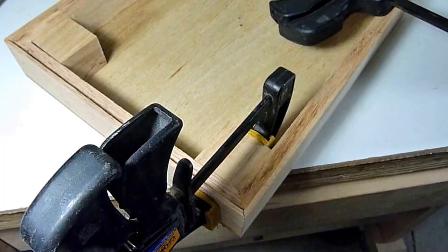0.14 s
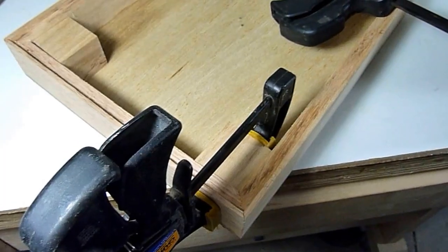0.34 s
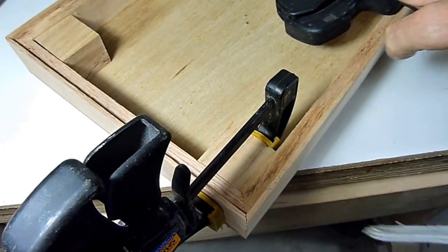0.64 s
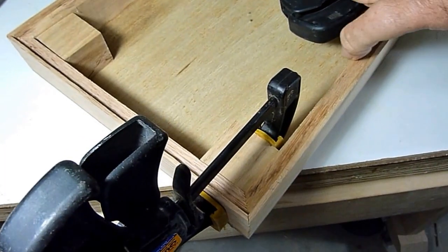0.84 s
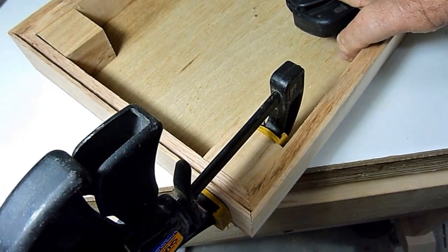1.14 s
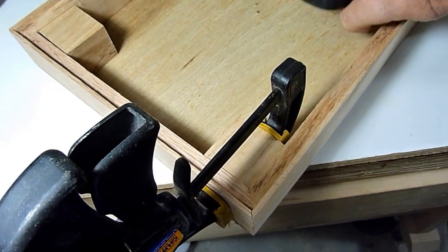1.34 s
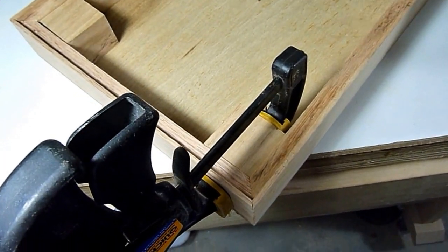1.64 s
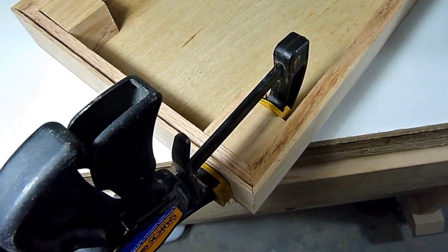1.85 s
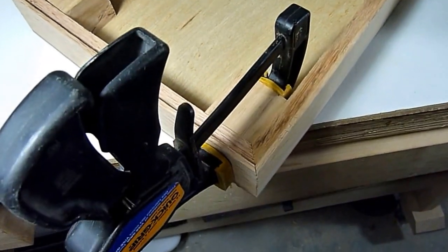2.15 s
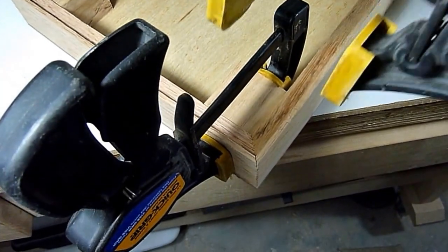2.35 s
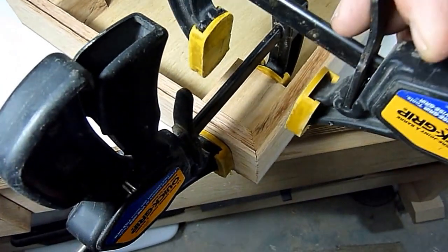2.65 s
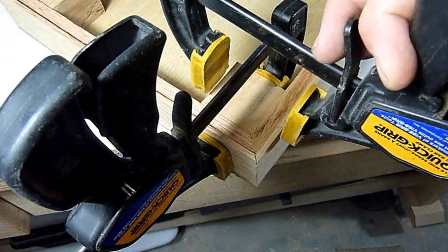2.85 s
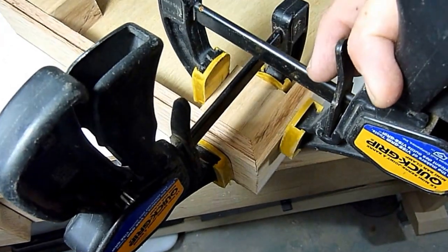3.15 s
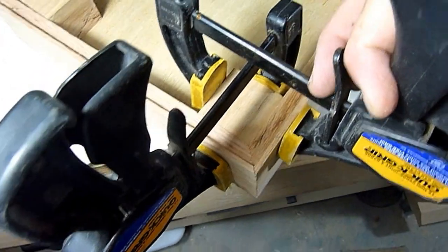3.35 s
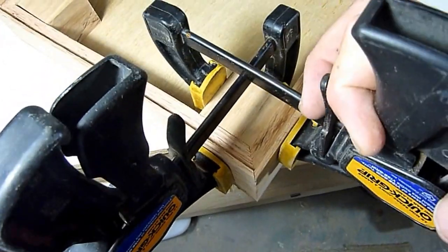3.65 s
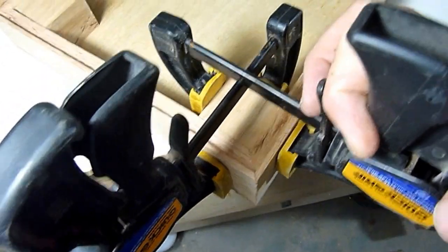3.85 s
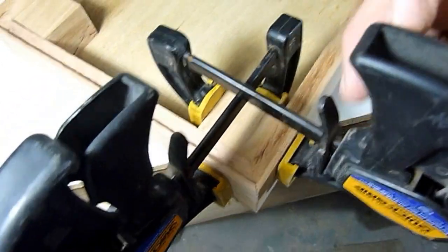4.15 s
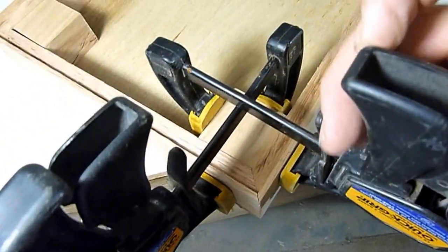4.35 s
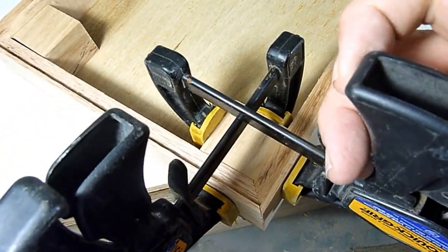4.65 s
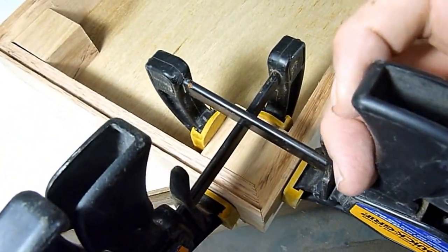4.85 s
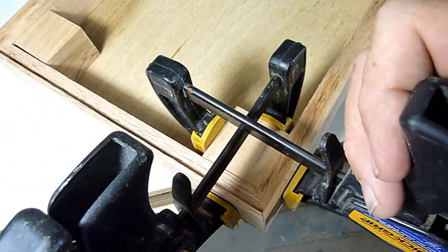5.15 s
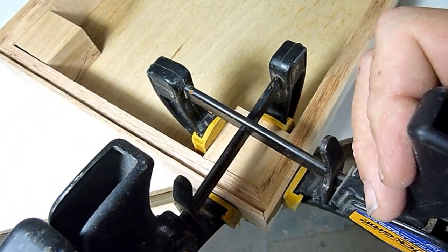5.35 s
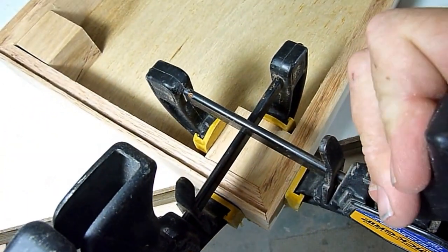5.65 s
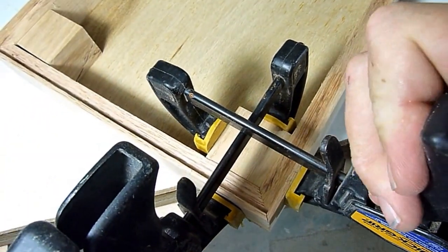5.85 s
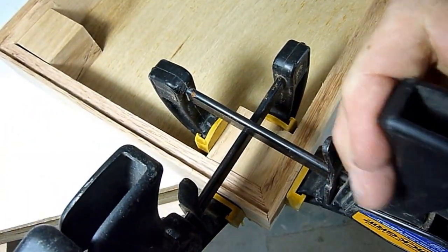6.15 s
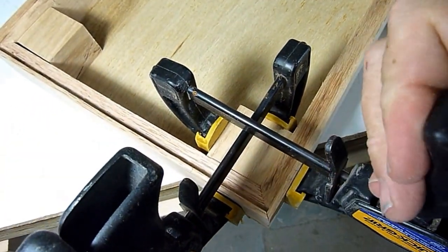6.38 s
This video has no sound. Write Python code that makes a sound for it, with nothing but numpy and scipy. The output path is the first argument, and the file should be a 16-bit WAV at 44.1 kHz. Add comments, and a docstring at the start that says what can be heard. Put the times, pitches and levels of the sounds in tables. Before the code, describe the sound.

Plastic bar clamps knock and scrape on a hollow plywood box, one hard bright slam midway, then close ticking and tapping as it is tightened.

```python
"""Over a soft room rush and mains hum, a hand brushes wood and lifts a plastic bar clamp that knocks and clicks.
The jaw slides down its steel bar and slams onto a plywood box; then the trigger ticks and knocks, close by.
Blows sum a broadband push, decaying modes, a crowd of short-lived modes in noise, and a diffuse room tail.
Rubbing is coloured noise with fast level flutter; the drawn bar whistles as a sine gliding with its speed."""
import sys
import numpy as np
from scipy import signal
from scipy.fft import rfft, irfft, next_fast_len
from scipy.io import wavfile
from scipy.ndimage import map_coordinates

SR = 44100
rng = np.random.default_rng(int(sys.argv[2]) if len(sys.argv) > 2 else 0)


def wrap_up_sound(samples):
    """Save the sound to the file named by the first command line argument, as 16-bit audio."""
    columns = np.atleast_2d(samples).T
    # keep every value between -1 and 1, then stretch to whole-number steps
    tamed = np.clip(columns, -1, 1)
    steps = np.round(tamed * 32767).astype(np.int16)
    wavfile.write(sys.argv[1], SR, steps)


N = 287399
TIME = np.arange(N) / SR  # s
LN_60DB = np.log(1000)


def amp(db):
    """Decibels to gain."""
    return 10 ** (np.asarray(db) / 20)


def unit(x):
    """Scale to rms 1."""
    return x / np.sqrt(np.mean(x ** 2) + 1e-20)


def burst(x):
    """Scale a blow to the energy of 10 ms at rms 1, averaged over channels."""
    energy = np.mean(np.sum(x ** 2, axis=-1))
    return x / np.sqrt(energy / (.01 * SR))


def along(points, hz):
    """Interpolate (frequency [Hz], value) points on a log-frequency axis."""
    f, v = np.transpose(points)
    return np.interp(np.log(hz + 1), np.log(f + 1), v)


def wobble(rate_hz):
    """Smooth random curve with rate_hz knots per second."""
    knots = rng.standard_normal(int(N * rate_hz / SR) + 4)
    return map_coordinates(knots, [TIME * rate_hz])


def filtered(x, response):
    """Multiply the spectrum of x by response(hz), zero-phase."""
    n = x.shape[-1]
    m = next_fast_len(n + 8192)
    return irfft(rfft(x, m) * response(np.fft.rfftfreq(m, 1 / SR)), m)[..., :n]


def causal(x, points):
    """Minimum-phase filter by (frequency [Hz], gain [dB]) points: no smear ahead of the attack."""
    n = x.shape[-1]
    m = 2 * n
    gain = amp(along(points, np.fft.rfftfreq(m, 1 / SR)))
    cepstrum = irfft(np.log(gain))
    cepstrum[1:n] *= 2
    cepstrum[n + 1:] = 0
    return irfft(rfft(x, m) * np.exp(rfft(cepstrum)))[..., :n]


def shelves(low_db, high_db, low_hz, high_hz):
    """Contact colour: bass and treble lift or cut, as (frequency [Hz], gain [dB]) points."""
    return [(low_hz / 2, low_db), (low_hz, 0), (high_hz, 0), (high_hz * 2, high_db)]


def rush(spectrum, alike):
    """Coloured stereo noise of rms 1; the mid/side split sets left-right likeness by frequency."""
    def mid_side_gain(hz):
        angle = np.arccos(np.clip(along(alike, hz), -1, 1)) / 2
        return amp(along(spectrum, hz)) * [np.cos(angle), np.sin(angle)]

    mid, side = filtered(rng.standard_normal((2, N)), mid_side_gain)
    return unit(np.array([mid + side, mid - side]))


def dying(bands, t):
    """Two unrelated noises whose (frequency [Hz], density [dB/Hz], t60 [s]) bands decay separately."""
    hz = np.fft.rfftfreq(len(t), 1 / SR)
    centres, dbs, t60s = np.transpose(bands)
    phasors = np.exp(2j * np.pi * rng.random((2, len(hz))))
    noise = phasors * amp(along(np.c_[centres, dbs], hz))
    out = 0
    for share, t60 in zip(np.eye(len(bands)), t60s):
        band = irfft(noise * along(np.c_[centres, share], hz), len(t))
        out = out + band * np.exp(-LN_60DB * t / t60)
    return out


# side level at close microphones: (frequency [Hz], gain [dB])
SIDE_WIDTH = [(100, -3.5), (300, -5), (700, 1), (2000, 7.5), (7000, 3.5), (12000, 10.5)]


def sideways(x):
    """Antiphase left-right part of a sound, strongest in the treble."""
    side = filtered(x, lambda hz: amp(along(SIDE_WIDTH, hz)))
    return np.array([side, -side])


# diffuse room tail: (frequency [Hz], relative level [dB], t60 [s])
ROOM_TAIL = [(60, 10.5, 0.39), (230, 1.5, 0.45), (487, 2.5, 0.71), (1040, -1.5, 0.546), (2480, 1, 0.52),
             (4200, -4.5, 0.61), (7620, -0.5, 0.35), (11000, -7, 0.4), (16000, -8.5, .3)]


def room(x):
    """Diffuse workshop tail: noise that builds up over a few ms, then decays by band."""
    t = np.arange(3 * SR // 4) / SR
    tail = dying(ROOM_TAIL, t) * (1 - np.exp(-t / 0.0047))
    tail = tail / np.linalg.norm(tail[0])
    mid, side = signal.fftconvolve(x[None], tail, axes=1)
    return mid + amp(-19.5) * sideways(side)


def add(track, start_s, x):
    """Mix x into track at start_s."""
    part = track[:, round(start_s * SR):][:, :x.shape[1]]
    part += x[:, :part.shape[1]]


def strike(modes, crowd, colour, length, crowd_db, push_db, side_db, wet_db):
    """One stereo blow: contact push, clear modes, crowd of short modes, room tail; length scales t60."""
    t = np.arange(SR // 4) / SR
    ring = 0
    for k, (hz, db, t60) in enumerate(modes):
        gain = amp(db + 0.5 * rng.standard_normal())
        decay = np.exp(-LN_60DB * t / (t60 * length))
        ring = ring + gain * np.cos(2 * np.pi * hz * t + k * np.pi) * decay
    ring = burst(ring)
    impulse = 1. * (t == 0)
    push = burst(causal(impulse, np.array(crowd)[:, :2]))
    crack, side = burst(dying(crowd, t / length))
    near = ring + amp(crowd_db) * crack + amp(push_db) * push
    # summed over all directions, modes stand out less than at the microphones
    around = push + amp(-4.0) * ring
    near, side, around = (burst(x) for x in causal(np.array([near, side, around]), colour))
    out = amp(wet_db) * room(around)
    add(out, 0, near + amp(side_db) * sideways(side))
    return out


# room rush spectrum: (frequency [Hz], density [dB/Hz])
AIR_SPECTRUM = [(12, -41.5), (20, -20), (48, -9.5), (91, -6.5), (113, -5), (146, -6), (222, -3.5),
                (328, -4.5), (422, -3.5), (542, -7.5), (923, -7.5), (1710, -12), (7520, -21),
                (13900, -27.5), (16000, -37)]
# room rush left-right likeness: (frequency [Hz], correlation [-1..1])
AIR_LIKENESS = [(60, 0.6), (150, 0.69), (380, 0.19), (950, -0.51), (2380, -0.558), (5980, -0.11),
                (15000, 0.087)]
# mains hum: (frequency [Hz], rms level [dB])
HUM_TONES = [(119.8, -64), (210, -69)]
AIR_DB = -48.5  # mean rush level


def workshop():
    """Room rush as coloured noise with slight level drift, plus hum sines with wandering phase."""
    hum = 0
    for hz, db in HUM_TONES:
        phase = 2 * np.pi * hz * TIME + 0.27 * wobble(rate_hz=3.0)
        hum = hum + np.sqrt(2) * amp(db) * np.sin(phase)
    air_gain = amp(AIR_DB + 0.47 * wobble(rate_hz=4.0))
    return air_gain * rush(AIR_SPECTRUM, AIR_LIKENESS) + hum


# plywood box modes: (frequency [Hz], relative level [dB], t60 at unit length [s])
PLYWOOD_MODES = [(98.5, -6, 0.14), (127.3, -3, 0.17), (224.2, 1, 0.17), (293.4, 8.5, 0.051),
                 (336, -3, 0.15), (467, -28, 0.24), (527.7, -17, 0.05), (896, -2, 0.043), (960, -8, 0.041),
                 (1088, -4, 0.06), (1120, -10, 0.14), (1306, -11, 0.11), (2310, -10, 0.046)]
# short-lived box modes: (frequency [Hz], density [dB/Hz], t60 at unit length [s])
PLYWOOD_CROWD = [(40, -27, .06), (110, 0, 0.16), (286, 4.5, 0.096), (690, -0.5, 0.075), (1070, 0, 0.08),
                 (1660, -11, 0.049), (3110, -18.5, 0.053), (5930, -24, 0.071), (11000, -29, 0.054),
                 (16000, -38, .02)]
# ring length factor at the usual level; dB of level that doubles it; usual level
BOX_RING, RING_DOUBLES_DB, USUAL_KNOCK_DB = 1.16, 36, -42


def knock(db, bass_db, treble_db):
    """One blow to the plywood box; harder blows ring longer."""
    colour = shelves(bass_db, treble_db, low_hz=525, high_hz=1230)
    length = BOX_RING * 2 ** ((db - USUAL_KNOCK_DB) / RING_DOUBLES_DB)
    blow = strike(PLYWOOD_MODES, PLYWOOD_CROWD, colour, length,
                  crowd_db=-2, push_db=-4.5, side_db=-16.5, wet_db=-15.5)
    return amp(db) * blow


# padded jaws on the box: (time [s], level [dB], bass [dB], treble [dB])
BOX_KNOCKS = [(0.596, -45.5, -5, -4), (0.754, -47, -6, 3), (1.352, -23.5, -9, 1), (1.3609, -30.5, 10.5, -7),
              (2.8724, -37.5, 15, 12.5), (3.054, -45, 23, -8), (4.065, -46, 0, -18),
              (5.9326, -28.5, 0, 10.5), (6.238, -43, 8, 6)]


def box_knocks():
    """Padded jaws bump the plywood; each contact has its own bass and treble balance."""
    out = np.zeros((2, N))
    for s, db, bass_db, treble_db in BOX_KNOCKS:
        add(out, s, knock(db, bass_db, treble_db))
    return out


# finger or trigger on the grip: (time [s], level [dB], body [dB], sparkle [dB], ring length factor [1])
GRIP_TAPS = [(.7545, -48, 2, -5, 1.4), (5.094, -52.5, -24, -12, 1.6), (5.4725, -45.5, -9, -26, 1.2),
             (5.5823, -31, 3.5, 3, 1.3), (5.8574, -40.5, 3, -19, 0.6)]
# hollow grip modes: (frequency [Hz], relative level [dB], t60 at unit length [s])
HOLLOW_GRIP_MODES = [(830, -8, 0.031), (1003, 6, 0.035), (1262, 0.5, 0.12), (1395, -3, 0.17),
                     (1909, -1, 0.078), (2200, -13, 0.066), (2930, -2, .06), (3210, -8, .03)]
# short-lived grip modes: (frequency [Hz], density [dB/Hz], t60 at unit length [s])
HOLLOW_GRIP_CROWD = [(150, -34, 0.029), (900, 0, 0.034), (2350, -1.5, 0.049), (4000, -8, 0.0285),
                     (8000, -19, 0.028), (16000, -36.5, 0.018)]
TAP_JOLT_DB = -2.5  # box blow relative to tap


def trigger_taps():
    """Tapped by finger or trigger, the hollow grip rings briefly and the box thuds with it."""
    out = np.zeros((2, N))
    for s, db, body_db, sparkle_db, length in GRIP_TAPS:
        colour = shelves(body_db, sparkle_db, low_hz=1700, high_hz=2250)
        tap = strike(HOLLOW_GRIP_MODES, HOLLOW_GRIP_CROWD, colour, length,
                     crowd_db=3, push_db=-8, side_db=-16, wet_db=-13.0)
        thud = knock(db + TAP_JOLT_DB, bass_db=1.0, treble_db=6)
        add(out, s, amp(db) * tap + thud)
    return out


# plastic rubbing spectrum: (frequency [Hz], density [dB/Hz])
PLASTIC_SPECTRUM = [(60, -27), (200, 10.5), (900, -1), (2300, 0.5), (4500, -1.5), (8000, -3), (11000, -5.5),
                    (16000, -14)]


def rasp():
    """Plastic rubbing in tiny slips: noise with fast random level, near rms 1."""
    slips = unit(amp(2.24 * wobble(rate_hz=450)))
    return slips * rush(PLASTIC_SPECTRUM, [(300, 0.97), (12000, 0.68)])


STROKE_DEPTH_DB, STROKE_RISE = 20.5, 0.45  # swell over a stroke; share of its length spent rising


def strokes(rows):
    """Gain of (peak time [s], level [dB], length [s]) strokes, swelling and fading linearly in dB."""
    gain = 0
    for s, db, length in rows:
        away = np.maximum((s - TIME) / STROKE_RISE, (TIME - s) / (1 - STROKE_RISE)) / length
        gain = gain + amp(db - STROKE_DEPTH_DB * away)
    return gain


# finger sliding over wood: (peak time [s], level [dB], length [s])
SKIN_STROKES = [(.802, -36.5, 0.075), (.858, -47, 0.15)]
# skin on wood spectrum: (frequency [Hz], density [dB/Hz])
SKIN_SPECTRUM = [(180, -34), (300, -28), (645, -32), (1150, 3), (1460, -14.5), (3190, -10), (3580, -6.5),
                 (4520, -18), (4910, -10.5), (7570, -14.5), (8790, -7.5), (14500, -14), (16000, -14)]
# clamp shifting in the hand: (peak time [s], level [dB], length [s])
CLAMP_RUBS = [(1.13, -55, 0.32), (3.145, -53, 0.21), (3.295, -46, 0.11), (3.54, -50, 0.22),
              (4.01, -49, 0.15), (4.16, -54, .35), (4.93, -56.5, 0.68), (5.102, -51, 0.1),
              (5.19, -57, 0.18), (5.36, -56.5, 0.76), (6, -52, 0.71), (6.22, -51, 0.19), (6.47, -56, .4)]
# hand bumping the grip: (peak time [s], level [dB])
GRIP_BUMPS = [(5.155, -43), (5.68, -53)]
# bump rumble spectrum: (frequency [Hz], density [dB/Hz])
RUMBLE_SPECTRUM = [(15, -12), (35, -9.5), (60, 0), (100, -2), (170, -13), (400, -50)]
BUMP_RISE_S, BUMP_T60_S = 0.031, 0.35  # 60 dB swell; 60 dB fade


def handling():
    """Skin and plastic rub in short noise strokes; the grip rumbles when the hand bumps it."""
    slips = unit(amp(1.4 * wobble(rate_hz=460)))
    skin = slips * rush(SKIN_SPECTRUM, [(300, 1.0), (12000, 0.55)])
    bumps = 0
    for s, db in GRIP_BUMPS:
        away = np.maximum((s - TIME) / BUMP_RISE_S, (TIME - s) / BUMP_T60_S)
        bumps = bumps + amp(db) * np.exp(-LN_60DB * away)
    rumble = bumps * rush(RUMBLE_SPECTRUM, [(60, 0.954)])
    return strokes(SKIN_STROKES) * skin + strokes(CLAMP_RUBS) * rasp() + rumble


# whistle of the drawn bar, pitch following speed: (time [s], pitch [Hz])
DRAW_PITCH = [(1.18, 8000), (1.29, 11150), (1.365, 13200), (1.47, 12000), (1.52, 11450), (1.58, 11100),
              (1.8, 9520), (1.95, 7460)]
WHISTLE_DB = -62  # mean peak level at top speed
DRAW_RASP_DB, DRAW_DB_PER_OCTAVE = -52.5, 22  # rasp at top speed; rasp level per octave of speed
RUN_UP_DB, RUN_UP_DB_PER_S = -34.5, 244  # rasp as the jaw lands; growth up to then


def sliding_bar():
    """The bar rasps and whistles as it is drawn; later the jaw's rasp swells until it hits the box."""
    s, hz = np.transpose(DRAW_PITCH)
    pitch_hz = np.interp(TIME, s, hz)
    moving = (TIME > s[0]) * (TIME < s[-1])
    drawn = amp(DRAW_DB_PER_OCTAVE * np.log2(pitch_hz / hz.max())) * moving
    phase = 2 * np.pi * np.cumsum(pitch_hz * (1 + .005 * wobble(rate_hz=600))) / SR
    whistle = amp(WHISTLE_DB + 3 * wobble(rate_hz=30)) * np.sin(phase)
    to_go_s = SLAM_HITS[0][0] - TIME
    run_up = amp(RUN_UP_DB - RUN_UP_DB_PER_S * np.abs(to_go_s)) * (to_go_s > 0)
    # squared: the whistle falls twice as many dB with speed as the rasp
    return drawn ** 2 * whistle + (amp(DRAW_RASP_DB) * drawn + run_up) * rasp()


# jaw and catch snaps: (time [s], level [dB], body [dB], sparkle [dB], ring length factor [1], box jolt [dB])
SNAPS = [(2.1653, -54.5, -1, -13, 1.3, -70), (2.267, -51.5, -1, -14, 2.2, -70),
         (2.339, -36, -8, -5.5, 0.67, -70), (2.3443, -34.5, -6.5, -13, 0.52, -70),
         (2.8723, -43.5, 3.5, -5.5, 1.2, -65), (2.9754, -26, -9, -8, 0.94, -58),
         (2.977, -29.5, -5.5, 8, 0.81, -60), (2.985, -38, 1, 11, 5.1, -40),
         (3.2357, -47.5, -7, 3, 2.1, -70), (3.6708, -51, -3, 6, .9, -65), (4.078, -46, -11, -2, 1.1, -67),
         (4.088, -49, -20, 5, 1.13, -67), (5.3085, -56.5, -12.5, 7.5, .9, -60),
         (5.5047, -42.5, -9, 13, 0.49, -41), (5.5353, -41, -5, -4, 0.68, -44.5),
         (5.579, -42, 3, 5, 0.69, -43), (5.928, -42.5, 3, 1.1, 2.2, -54),
         (5.9433, -29, 0.4, -2.5, 2.5, -33.5), (6.0855, -51.5, 4.5, -8.5, 0.98, -62),
         (6.4062, -52.5, 1.2, 3, .9, -57), (6.4516, -42.5, -0.5, 5, 0.64, -36.5),
         (6.4889, -47, 0, -1, 0.89, -43)]
# loose clamp modes: (frequency [Hz], relative level [dB], t60 at unit length [s])
LOOSE_CLAMP_MODES = [(1590, -14, .02), (1818, -4, 0.029), (2200, -5, 0.011), (2397, 1, 0.023),
                     (3080, -10, 0.0087), (3610, -1.5, 0.014), (4150, -3.5, 0.0073), (4330, -8.5, 0.022),
                     (5030, -4.5, 0.0076), (5640, -8.5, 0.017), (8700, -8, 0.016), (10700, -16, 0.011)]
# short-lived clamp modes: (frequency [Hz], density [dB/Hz], t60 at unit length [s])
LOOSE_CLAMP_CROWD = [(100, -24, 0.0143), (905, -3.5, 0.025), (1900, 2.5, 0.04), (4200, -2, 0.027),
                     (6640, 1, 0.0081), (10400, -9.5, 0.028), (16000, -9.5, .008)]
CLICK_PAN_DB = -1.5  # left minus right
THUD_BASS_DB, THUD_TREBLE_DB = 7.5, 1  # colour of a jolt passed to the box


def clamp_clicks():
    """Hard plastic and the steel catch snap together, a little to the right, and jolt the box."""
    out = np.zeros((2, N))
    pan = amp([[CLICK_PAN_DB / 2], [-CLICK_PAN_DB / 2]])
    for s, db, body_db, sparkle_db, length, jolt_db in SNAPS:
        colour = shelves(body_db, sparkle_db, low_hz=3630, high_hz=4760)
        click = strike(LOOSE_CLAMP_MODES, LOOSE_CLAMP_CROWD, colour, length,
                       crowd_db=-0.5, push_db=-3.0, side_db=-15.5, wet_db=-18)
        thud = knock(jolt_db, THUD_BASS_DB, THUD_TREBLE_DB)
        add(out, s, amp(db) * pan * click + thud)
    return out


# jaw hitting wood and chattering: (time [s], level [dB], body [dB], sparkle [dB], ring length factor [1])
SLAM_HITS = [(3.7406, -15.5, -21, 6, 0.44), (3.7414, -13.5, 2, 0, 1.3), (3.7441, -21, -1.5, -4, 0.5),
             (3.7495, -33, -16, 8.5, .6), (3.7669, -37, 3.5, -5, 0.29)]
# steel bar modes, jaws closed: (frequency [Hz], relative level [dB], t60 at unit length [s])
STEEL_BAR_MODES = [(159, -19, 0.091), (229, -9.5, 0.21), (303, -13.5, 0.14), (540, -10, 0.11),
                   (668, -5.5, 0.039), (800, -4.5, 0.048), (1062, 4, 0.04), (1190, -2, 0.049),
                   (1295, -5.5, 0.085), (1845, 2.5, 0.037), (2257, 1, 0.044), (2844, 0.5, 0.05),
                   (4280, -8, 0.027), (5350, -13, 0.0216), (5920, -9.5, 0.033), (6030, 1.5, 0.024),
                   (6300, -1, 0.037), (7500, -13, .025), (7730, -5.5, 0.03), (9030, -12, 0.0187),
                   (11420, -23, .015)]
# short-lived bar modes: (frequency [Hz], density [dB/Hz], t60 at unit length [s])
STEEL_BAR_CROWD = [(35, -34, .05), (149, -0.5, 0.054), (260, 1.5, 0.053), (416, -7, 0.039),
                   (1120, 1, 0.019), (1510, -4.5, 0.017), (2000, -1, 0.023), (2550, -5, 0.028),
                   (3000, -2, 0.026), (4220, -5.5, 0.018), (6500, -5, 0.036), (8950, -8.5, 0.031),
                   (10400, -13.5, 0.011), (11500, -6.5, 0.011), (13300, -17, 0.011), (16000, -22, .012)]
# bright room tail after the slam: (frequency [Hz], density [dB/Hz], t60 [s])
BRIGHT_TAIL = [(2500, -27, .4), (4500, -16, 0.77), (6200, 0, .45), (8490, 1, 0.538), (10100, -11, 0.49),
               (13000, -36, .3), (16000, -40, .3)]


def jaw_slam():
    """The jaw stops dead on the box: bar and wood ring, and a bright, hissing room tail swells and dies."""
    out = np.zeros((2, N))
    for s, db, body_db, sparkle_db, length in SLAM_HITS:
        colour = shelves(body_db, sparkle_db, low_hz=3560, high_hz=4000)
        hit = strike(STEEL_BAR_MODES, STEEL_BAR_CROWD, colour, length,
                     crowd_db=-0.5, push_db=-6, side_db=-15.5, wet_db=-12.0)
        add(out, s, amp(db) * hit)
    t = np.arange(SR // 2) / SR
    swell = 1 - np.exp(-t / 0.052)
    tail = burst(dying(BRIGHT_TAIL, t) * swell)[0]
    add(out, SLAM_HITS[0][0], amp(-30) * tail[None])
    return out


def scene():
    """Sum of all sources at the two microphones."""
    return (workshop() + box_knocks() + trigger_taps() + handling()
            + sliding_bar() + clamp_clicks() + jaw_slam())


START_S, FADE_IN_S, TOP_HZ = .444, 0.0023, 16000


def record(dry):
    """Silence until START_S, smooth overload at full scale, band limit at TOP_HZ."""
    opened = dry * np.clip((TIME - START_S) / FADE_IN_S, 0, 1)
    clipped = opened / (1 + np.abs(opened) ** 6) ** (1 / 6)
    return filtered(clipped, lambda hz: hz < TOP_HZ)


dry = scene()
out = record(dry)
wrap_up_sound(out)
```